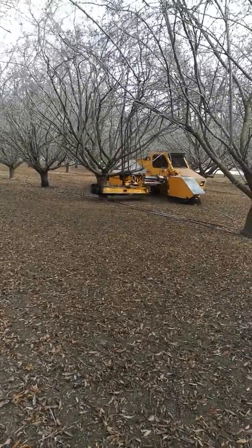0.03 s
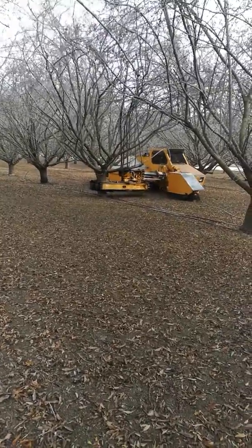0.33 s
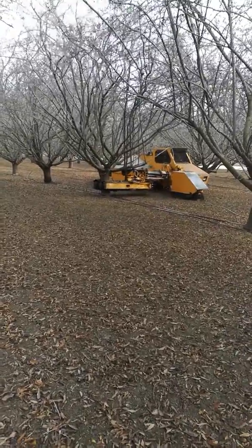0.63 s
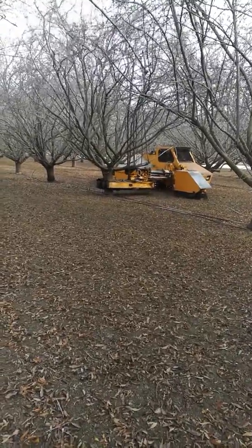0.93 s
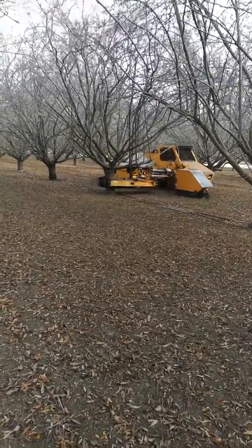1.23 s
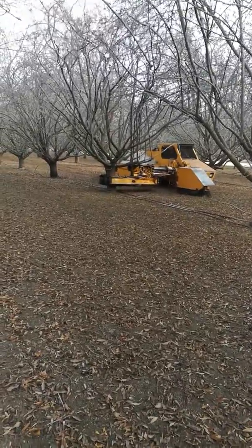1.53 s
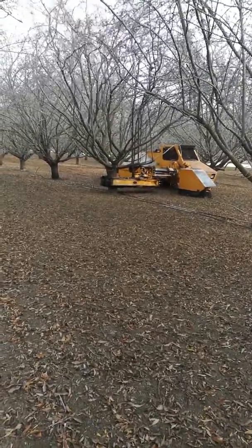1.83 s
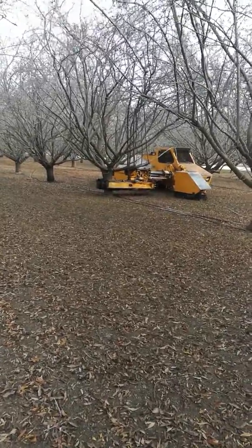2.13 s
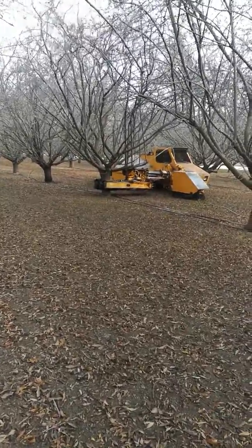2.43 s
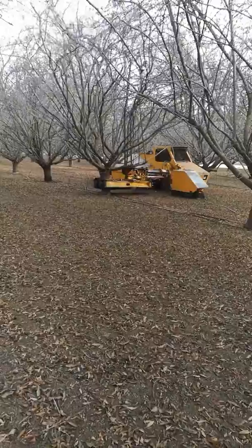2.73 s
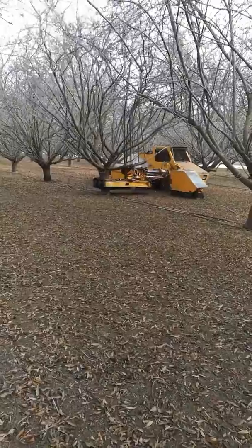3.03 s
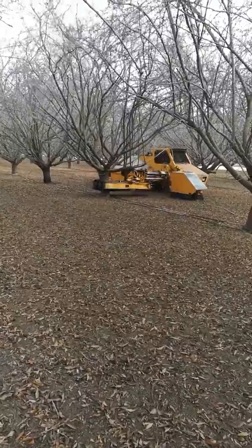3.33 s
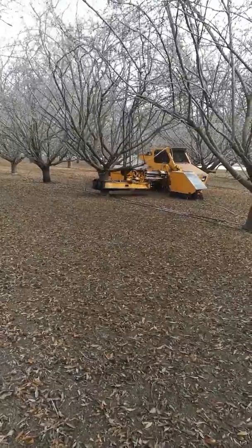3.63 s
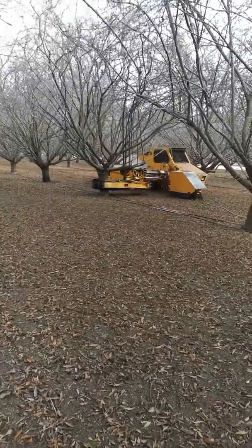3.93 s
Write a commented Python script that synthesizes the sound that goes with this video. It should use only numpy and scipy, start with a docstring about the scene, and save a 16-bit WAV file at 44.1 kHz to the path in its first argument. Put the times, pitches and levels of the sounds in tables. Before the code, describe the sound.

Diesel tree shaker running with fast metallic clatter and rattling twigs until the shaking slows.

```python
"""Tree shaker in an orchard

A diesel engine drones at working speed while spinning weights rock a clamp gripping a trunk.
Twice a turn the steel knocks and the trunk thumps; twigs and nuts rattle and snap. Near the end
the hydraulics hiss, the shaking runs down and the unloaded engine picks up a little."""
import sys
import numpy as np
from scipy import signal
from scipy.fft import rfft, irfft
from scipy.io import wavfile

SR = 44100
rng = np.random.default_rng(int(sys.argv[2]) if len(sys.argv) > 2 else 0)


def materialize(psi):
    """Save the field psi as 16-bit PCM at rate SR to the path in sys.argv[1].

    A 1-D psi becomes a single channel; in a 2-D psi each row is a channel.
    """
    bounded = np.clip(np.atleast_2d(psi).T, -1, 1)
    quanta = np.round(bounded * 32767).astype(np.int16)
    wavfile.write(sys.argv[1], SR, quanta)


N = 176400

# engine running state (time [s], firing rate [Hz], level swing [dB])
ENGINE_RUN = [(0, 101.8, 4.5), (.4, 102.6, 3), (.65, 102.4, -0.5), (1.1, 102.6, 2.5), (2.1, 103.3, -5),
              (2.6, 103.3, -0.5), (3.08, 102.7, -2), (3.25, 106.2, -2), (4, 103.5, -1.5)]
# engine and pump tones (multiple of firing rate [1], level [dB], share of level swing [1])
ENGINE_ORDERS = [(1, -29.5, 0.58), (2, -26, 1.55), (3, -40, 0), (10 / 3, -42, 0.27)]
# exhaust rumble and distant machine noise (frequency [Hz], relative density [dB])
EXHAUST_SPECTRUM = [(20, -47), (60, -18.5), (90, -5), (220, -1), (280, -5.5), (345, -13.5), (410, -15.5),
                    (900, -18.5), (1300, -21.5), (1700, -42), (3300, -20), (5300, -23.5), (16000, -43)]
# shaker drive (time [s], rotation [turns/s], thump gain [dB], knock gain [dB], rattle gain [dB])
SHAKER_RUN = [(0, 14.5, 8.5, -6.5, 0.5), (.22, 14.8, 5, 2, 2), (.32, 16.05, 7.5, 1, 4),
              (.45, 17.8, 0, 0.5, 4), (.66, 21.8, 0.5, -4.5, 0.5), (.82, 20.2, 1, -3, 2),
              (1.25, 23.2, 4.5, 0, 2), (1.65, 24, 0.5, 0.5, 1), (3.04, 26.6, -1, -0.5, 0.5),
              (3.2, 20.7, 5.5, 1, 1.5), (3.42, 16.6, -2.5, -5.5, -2.5), (3.56, 16, -32, -23, -5),
              (3.72, 12.9, 1, -1.5, -10), (3.8, 12.6, -26, -38, -10), (4, 11, -18, -38, -12)]
# clamp resonances (frequency [Hz], bandwidth [Hz], gain [dB])
STEEL_MODES = [(1022, 53, 3.5), (1283, 47, 15), (1413, 39, 2), (1902, 67, 0.5), (2107, 108, 1.5),
               (3528, 41, 10), (4052, 63, 3), (5036, 33, 2), (5400, 120, -0.5), (9570, 145, -7)]
# broad clatter of the clamp (frequency [Hz], relative density [dB])
CLATTER_SPECTRUM = [(100, -50.5), (380, -14), (530, 2.5), (950, -4), (1650, -4.5), (2100, -14.5),
                    (2600, -8), (3200, -7.5), (4400, -10.5), (9000, -45)]
# thump of trunk and ground (frequency [Hz], relative density [dB])
TRUNK_SPECTRUM = [(25, -33), (75, -9), (120, -21), (148, -1), (171, 6), (190, -5), (260, -10), (340, -10),
                  (420, -23), (750, -20), (1200, -63)]
# rattle of twigs and nuts (frequency [Hz], relative density [dB])
TWIG_SPECTRUM = [(200, -23), (900, 2), (2000, -3.5), (3000, 3), (4500, -3.5), (5500, -3), (8200, -5.5),
                 (12000, -18), (16000, -26)]
# hard blows on the clamp (time [s], relative level [dB])
CLANK_BLOWS = [(0.012, 1), (0.049, 1), (0.079, -0.5), (0.115, -2), (0.259, 3.5), (0.282, 2), (0.32, 2),
               (0.35, -1.5), (0.504, 0), (0.529, -3), (.781, 3), (.820, -3), (.966, -6), (1.4031, -0.5),
               (1.611, -2.5), (1.81, -6), (2.254, -1.5), (2.555, -4.5), (2.653, -4), (2.849, -5),
               (3.047, -2), (3.358, -1.5), (3.382, -3), (3.415, 0), (3.597, -5.5), (3.62, -9.5),
               (3.658, -4.5), (3.731, -8.5)]
# twigs snapping and nuts striking (time [s], relative level [dB], band centre [Hz])
TWIG_SNAPS = [(0.279, -3.5, 4160), (0.298, -5, 3800), (0.338, 3.5, 4900), (0.454, -0.5, 5200),
              (0.507, -11, 6500), (0.556, -16, 7440), (0.57, -4.5, 3540), (0.799, -6, 6500),
              (1.030, -3.5, 4970), (1.267, -12, 6500), (1.404, -2, 3070), (1.482, -10, 8170),
              (2.876, -7.5, 5500), (3.332, -8.5, 7140), (3.415, -17, 4220), (3.477, -3.5, 5370),
              (3.535, -8.5, 5000), (3.595, -7, 4940), (3.657, -11.5, 3760)]
# heavy blows on the trunk (time [s], relative level [dB])
TRUNK_JOLTS = [(1.399, -14), (1.538, -11.5), (3.219, -20), (3.816, -13.5)]
# likeness of left and right (frequency [Hz], coherence [1])
COHERENCE = [(120, .994), (350, .96), (1300, .95), (1900, .65), (2800, .74), (3800, .3), (5400, .45),
             (7500, .15)]
# lead of left over right (frequency [Hz], phase [rad])
LEFT_LEAD = [(340, 0), (440, 2.3), (740, 2.6), (880, .2), (1020, 1.6), (1400, 1.6), (1850, 7), (2200, 7.1),
             (2550, 8.6), (2950, 9.3), (4400, 10.3), (5400, 12.6), (6700, 15.7), (16000, 36)]
# excess of left over right (frequency [Hz], level [dB])
LEFT_EXCESS = [(200, 0), (520, 0), (660, 20.5), (790, 17.5), (950, 2.5), (1280, 6.5), (1500, -5.5),
               (1700, 5), (2100, -4.5), (2400, 4.5), (3100, -3.5), (3550, 10), (4900, 4), (8700, 13.5),
               (15000, -1.5)]

ORCHARD_DB, ORCHARD_DECAY_S = -5, 0.031
EDGE_HZ = 15850


def amp(db):
    """Amplitude grows tenfold for every 20 dB."""
    return 10 ** (np.asarray(db) / 20)


def unit_rms(x):
    """Normalisation to unit mean power."""
    return x / np.sqrt(np.mean(x ** 2) + 1e-20)


def over_time(table, column):
    """Linear interpolation of one column at every sample."""
    rows = np.array(table)
    return np.interp(np.arange(N) / SR, rows[:, 0], rows[:, column])


def over_frequency(table, hz):
    """Interpolation on a logarithmic frequency axis."""
    frequencies, values = np.transpose(table)
    return np.interp(np.log(hz + 1), np.log(frequencies + 1), values)


def noise():
    """Two incoherent white noises: one common to both sides, one diffuse."""
    return rng.standard_normal((2, N))


def colour(x, spectrum, size=4096):
    """Minimum-phase filtering imposes a spectrum causally."""
    log_gain = np.log(amp(over_frequency(spectrum, abs(np.fft.fftfreq(size, 1 / SR)))))
    taps = np.fft.ifft(np.exp(np.conj(signal.hilbert(log_gain)))).real
    return signal.oaconvolve(x, taps[None, :size // 2], axes=1)[:, :N]


def drift(rate_hz):
    """Low-passed noise gives a slow fluctuation of unit rms."""
    hz = np.fft.rfftfreq(N, 1 / SR)
    return unit_rms(irfft(rfft(rng.standard_normal(N)) * np.exp(-(hz / rate_hz) ** 2), N))


def add(mix, start_s, sound):
    """Superposition: a sound adds to the mix from its onset."""
    part = mix[..., round(start_s * SR):][..., :sound.shape[-1]]
    part += sound[..., :part.shape[-1]]


def blows(times, db, decay_s):
    """Impulsive excitation: the envelope jumps at each blow and decays exponentially."""
    hits = np.zeros(N)
    np.add.at(hits, np.clip(np.asarray(times) * SR, 0, N - 1).astype(int), amp(db))
    return signal.lfilter([1], [1, -np.exp(-1 / (decay_s * SR))], hits)


def struck(events, hz, decay_s):
    """A damped oscillator rings afresh at each blow, rising over half a cycle."""
    t = np.arange(SR // 2) / SR
    mode = np.sin(2 * np.pi * hz * t) * np.exp(-t / decay_s) * np.minimum(2 * hz * t, 1)
    out = np.zeros(N)
    for start_s, db in events:
        add(out, start_s, amp(db) * mode)
    return out


def engine():
    """Periodic firing gives harmonics, joined by a pump tone and a steady exhaust rumble."""
    waver_hz, waver_db = 0.693, 1.29
    firings = np.cumsum(over_time(ENGINE_RUN, 1) + waver_hz * drift(rate_hz=8.6)) / SR
    swing_db = over_time(ENGINE_RUN, 2)
    tones = np.zeros(N)
    for order, db, share in ENGINE_ORDERS:
        gain = amp(db + share * (swing_db + waver_db * drift(rate_hz=51)))
        tones += gain * np.sin(2 * np.pi * (order * firings + rng.random()))
    exhaust = amp(-30) * unit_rms(colour(noise(), EXHAUST_SPECTRUM))
    return np.sqrt(2) * tones + exhaust


def echoed(envelope):
    """Scattering by the surrounding trees adds a short tail of energy to an envelope."""
    pole = np.exp(-1 / (ORCHARD_DECAY_S * SR))
    tail_power = amp(ORCHARD_DB) ** 2 * signal.lfilter([1 - pole], [1, -pole], envelope ** 2)
    return np.sqrt(envelope ** 2 + tail_power + 1e-20)


def steel(contact, clatter_db):
    """Resonance: rattling contact excites the clamp's modes along with a broad clatter."""
    drive = echoed(contact)
    out = amp(clatter_db) * colour(drive * noise(), CLATTER_SPECTRUM)
    for hz, width_hz, db in STEEL_MODES:
        radius = np.exp(-np.pi * width_hz / SR)
        feedback = [1, -2 * radius * np.cos(2 * np.pi * hz / SR), radius ** 2]
        out += amp(db) * signal.lfilter([1 - radius, 0, radius - 1], feedback, drive * noise())
    return unit_rms(out) * np.sqrt(np.mean(drive ** 2))


def clamp(turns):
    """Forced vibration: each stroke and backstroke knocks the steel and thumps the trunk."""
    jitter_s, scatter_db, backstroke_db = 0.002, 1.2, -3.5
    beat_hz, beat_knock_db, beat_thump_db = 8.5, 1.4, 0.5
    strokes = np.flatnonzero(np.diff(np.floor(2 * turns)))
    lateness, force = rng.standard_normal((len(strokes), 2)).T
    times = strokes / SR + jitter_s * lateness
    db = scatter_db * force + backstroke_db * (np.arange(len(strokes)) % 2)
    # the two weights turn at different speeds, so their force beats
    beat = np.sin(2 * np.pi * np.cumsum(beat_hz + drift(rate_hz=6.8)) / SR)[strokes]
    knocks = unit_rms(blows(times, db + beat_knock_db * beat, decay_s=0.0065))
    ring = steel(knocks * amp(-25 + over_time(SHAKER_RUN, 3)), clatter_db=1)
    shoves = blows(times, db + beat_thump_db * beat, decay_s=0.0088)
    thump = unit_rms(colour(shoves * noise(), TRUNK_SPECTRUM))
    return ring + thump * amp(-28 + over_time(SHAKER_RUN, 2))


def sway(turns):
    """Rotating unbalance sways the tree at two harmonics, growing as the cube of speed."""
    reference_hz = 24.5
    motion = np.sin(2 * np.pi * turns) + np.sin(4 * np.pi * turns)
    return motion * amp(-41.5) * (over_time(SHAKER_RUN, 1) / reference_hz) ** 3


def ticks():
    """Shot noise: small random impacts add in energy to form an envelope."""
    per_s, spread_db, decay_s = 2000, 3.5, 0.0033
    sizes = amp(spread_db * np.minimum(rng.exponential(1, N), 5))
    impacts = sizes * (rng.random(N) < per_s / SR)
    energy = signal.lfilter([1], [1, -np.exp(-2 / (decay_s * SR))], impacts ** 2)
    return unit_rms(np.sqrt(energy))


def branches(turns, bands=4, pulse_depth=0.022):
    """Amplitude modulation: twigs of several sizes tick, surging slightly with each stroke."""
    octave = np.log2(np.fft.rfftfreq(N, 1 / SR) + 1)
    spectrum = rfft(unit_rms(colour(noise(), TWIG_SPECTRUM)))
    common_ticks = ticks()
    rattle = np.zeros((2, N))
    for k in range(bands):
        comb = np.maximum(np.cos(np.pi * (octave - 2 * k / bands)), 0) ** 2  # repeats every 2 octaves
        rattle += irfft(spectrum * comb, N) * np.hypot(ticks(), common_ticks)
    surge = 1 + pulse_depth * np.cos(4 * np.pi * turns)
    return unit_rms(rattle) * surge * amp(-24 + over_time(SHAKER_RUN, 4))


def clanks():
    """Free vibration: single hard blows leave the clamp's strongest mode ringing clearly."""
    strongest_hz, _, _ = max(STEEL_MODES, key=lambda mode: mode[-1])
    times, db = np.transpose(CLANK_BLOWS)
    contact = steel(blows(times, db, decay_s=0.0078), clatter_db=-5.5)
    ring = amp(-3) * struck(CLANK_BLOWS, strongest_hz, decay_s=0.024)
    return amp(-14) * (contact + ring)


def snaps():
    """Brittle fracture: a twig gives a splintering crack, the thinner the brighter, and a short echo."""
    band_ratio, decay_s = 1.53, 0.005
    t = np.arange(SR // 10) / SR
    echo = amp(-10) * np.exp(-t / ORCHARD_DECAY_S)
    splinters = ticks()
    out = np.zeros((2, N))
    for start_s, db, hz in TWIG_SNAPS:
        band = signal.butter(2, [hz / band_ratio, min(hz * band_ratio, EDGE_HZ)], "bandpass", fs=SR)
        crack = unit_rms(signal.lfilter(*band, rng.standard_normal((2, len(t)))))
        fracture = np.exp(-t / decay_s) * unit_rms(splinters[round(start_s * SR):][:len(t)])
        add(out, start_s, amp(db - 10.5) * crack * np.hypot(fracture, echo))
    return out


def jolts():
    """Strong damping makes the occasional heavy blow on the trunk sound dull."""
    return struck(TRUNK_JOLTS, hz=178, decay_s=0.014)


def hydraulics():
    """Pressure relief gives a short swell of band-limited hiss as the weights are braked."""
    centre_hz, width_hz, peak_s, spread_s = 2920, 710, 3.23, 0.098
    hz = np.fft.rfftfreq(N, 1 / SR)
    hiss = irfft(rfft(noise()) / (1 + (2 * (hz - centre_hz) / width_hz) ** 2), N)
    swell = np.exp(-0.5 * ((np.arange(N) / SR - peak_s) / spread_s) ** 2)
    return amp(-26.5) * unit_rms(hiss) * swell


def scene():
    """Partial coherence: the sources reach left and right alike in the bass, unlike in the treble."""
    turns = np.cumsum(over_time(SHAKER_RUN, 1)) / SR
    shaking = engine() + clamp(turns) + sway(turns) + branches(turns)
    left, diffuse = shaking + clanks() + snaps() + jolts() + hydraulics()
    hz = np.fft.rfftfreq(2 * N, 1 / SR)
    coherence = np.clip(over_frequency(COHERENCE, hz), 0, 1)
    right = coherence * rfft(left, 2 * N) - 1j * np.sqrt(1 - coherence ** 2) * rfft(diffuse, 2 * N)
    right *= amp(-over_frequency(LEFT_EXCESS, hz)) * np.exp(-1j * over_frequency(LEFT_LEAD, hz))
    return np.array([left, irfft(right, 2 * N)[:N]])


def record(dry):
    """Band limiting: a linear-phase low-pass removes the highest treble."""
    taps = signal.firwin(511, EDGE_HZ, window=("kaiser", 9), fs=SR)
    return signal.oaconvolve(dry, taps[None], "same")


dry = scene()
out = record(dry)
materialize(out)
```